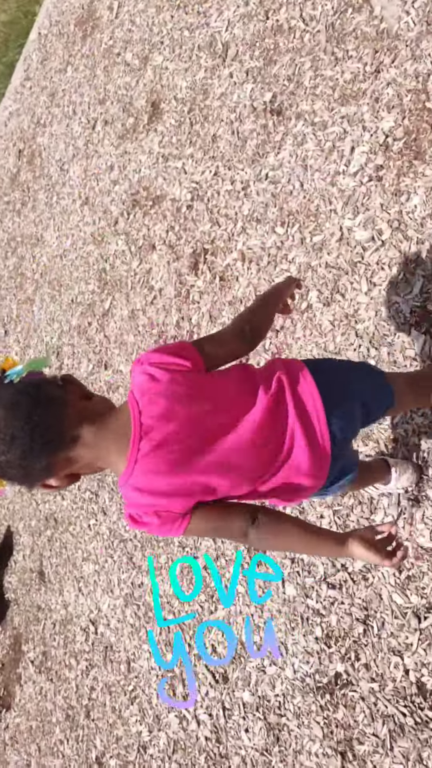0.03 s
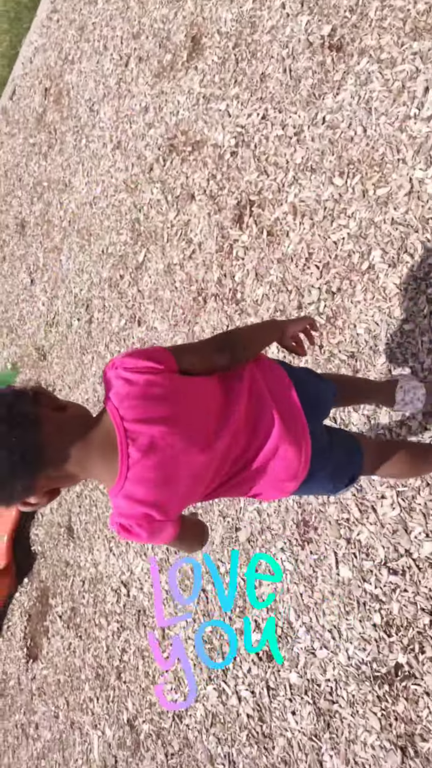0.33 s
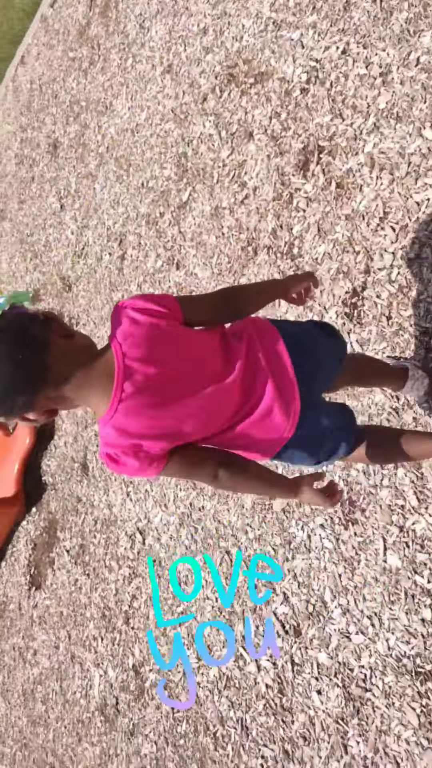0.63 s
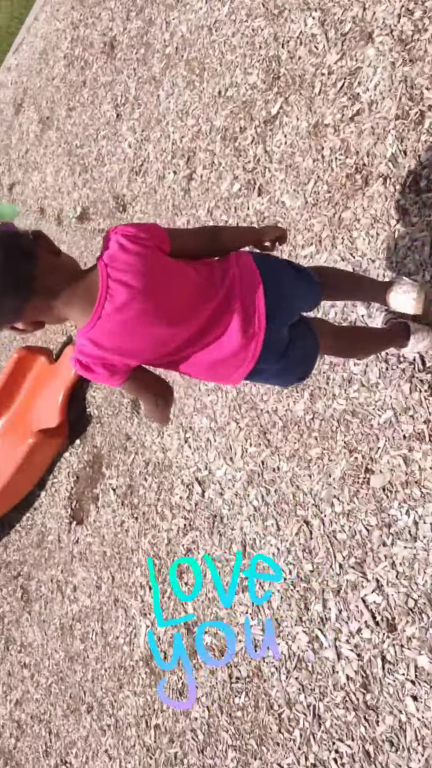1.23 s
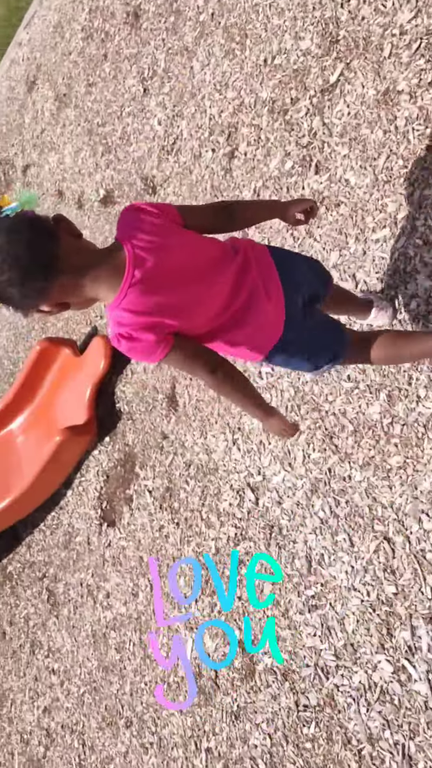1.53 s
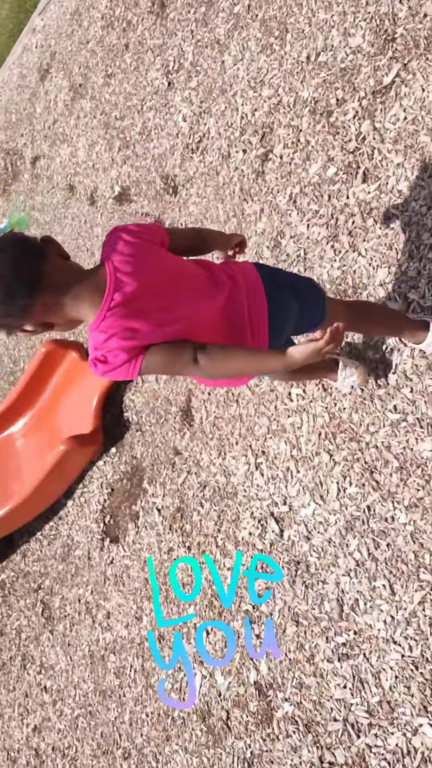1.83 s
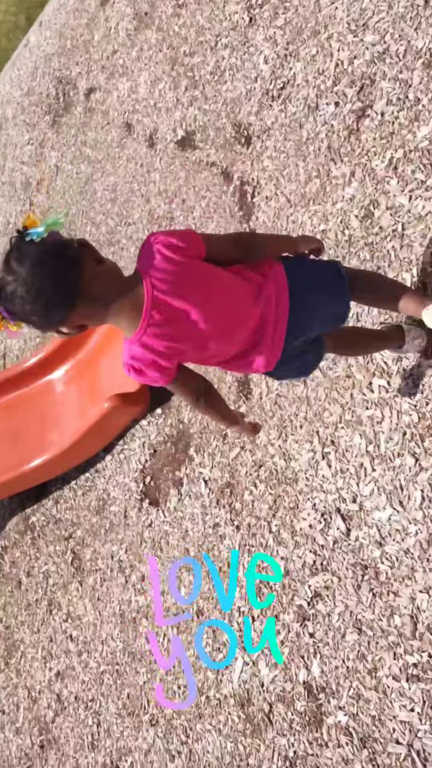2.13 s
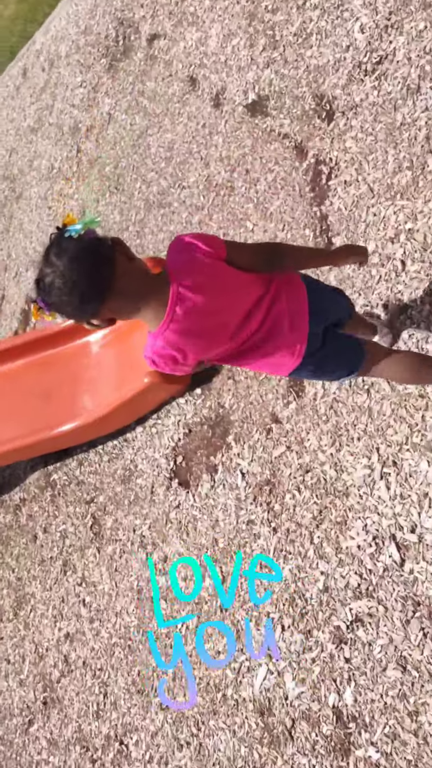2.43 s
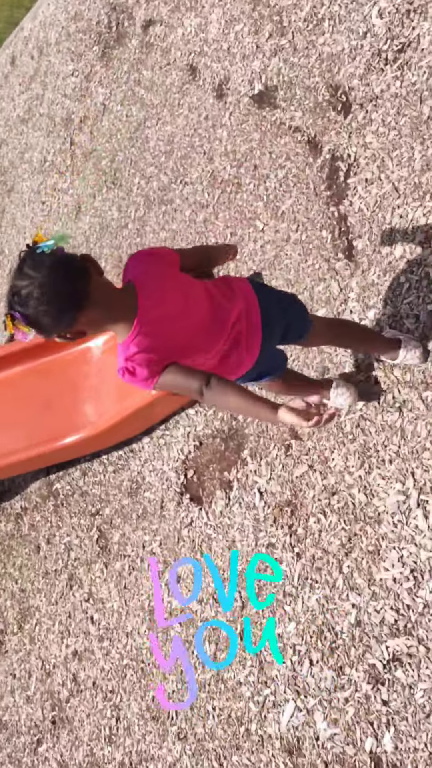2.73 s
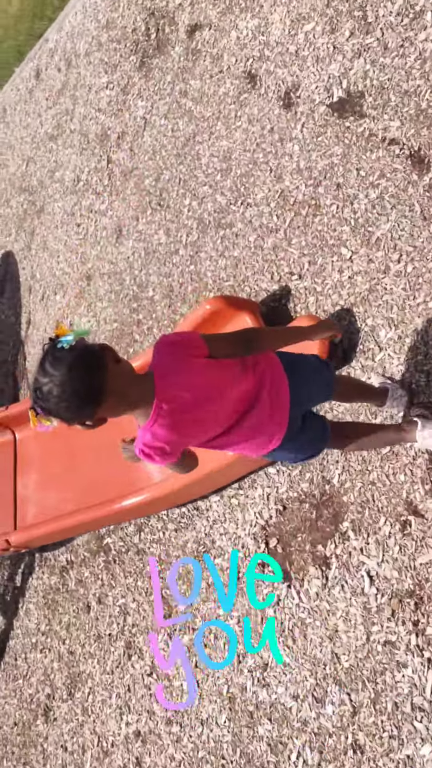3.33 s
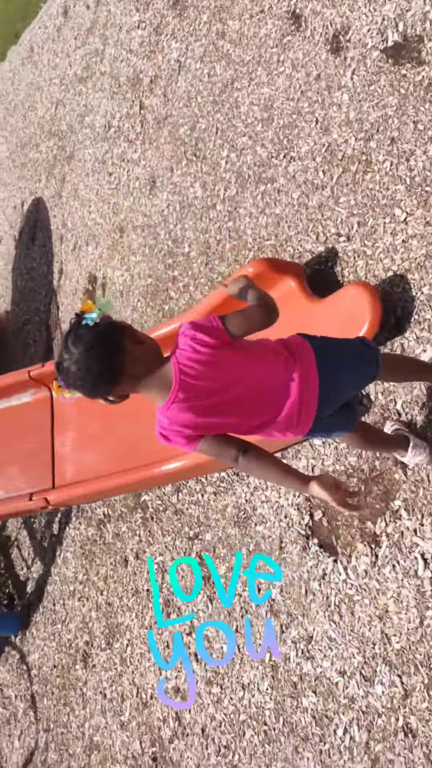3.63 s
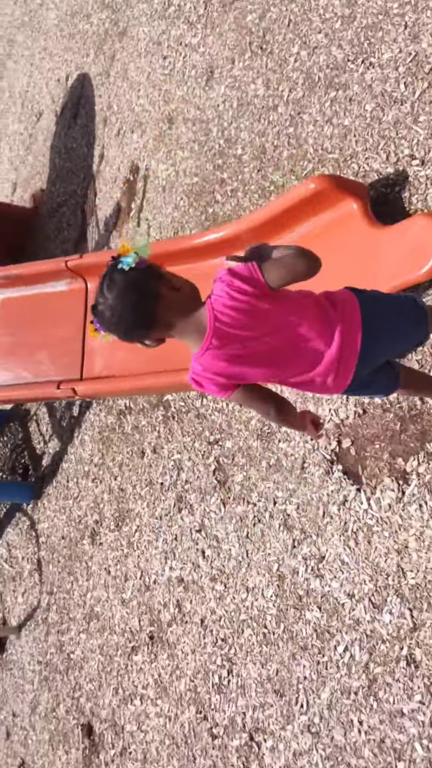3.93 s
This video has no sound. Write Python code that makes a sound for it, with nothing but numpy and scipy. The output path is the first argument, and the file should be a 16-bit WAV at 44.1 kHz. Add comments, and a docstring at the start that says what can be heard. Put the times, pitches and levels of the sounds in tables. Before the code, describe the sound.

Gusty wind buffets the microphone, with faint, slow steps crunching wood chips and light metal clinks.

```python
"""Wind rumbles and puffs on a microphone, over faint, slow steps on playground wood chips.
Turbulent pressure at the microphone port makes the rumble, and single eddies make the thumps.
Each step crunches as chip strikes chip, and a few chips snap. Small metal pieces carried by the
walker, probably keys, clink and ring in their modes. A soft outdoor hush and a faint,
flickering hiss lie behind."""
import sys
import numpy as np
from scipy.fft import rfft, irfft, next_fast_len
from scipy.io import wavfile
from scipy.ndimage import uniform_filter1d, map_coordinates

SR = 44100
rng = np.random.default_rng(int(sys.argv[2]) if len(sys.argv) > 2 else 0)


def transcribe(u):
    """Save the signal u as a 16-bit wav file named by the first command-line argument.

    u: samples, shape (n,) or (channels, n), limited to [-1, 1]; the rate is SR.
    q: integer samples, one column per channel.
    """
    v = np.clip(np.atleast_2d(u).T, -1, 1)
    q = np.round(v * 32767).astype(np.int16)
    wavfile.write(sys.argv[1], SR, q)


N = 176400

# spectrum of a hard, brief contact: frequency_hz, level_db
CLACK_SPECTRUM = [(1500, -10), (4000, -13.5), (6500, -10.5), (9000, -0.5), (12000, -1), (15500, -7)]
# bright spectrum of the steps' scrape and the background hiss: frequency_hz, level_db
BRIGHT_SPECTRUM = [(2000, -18), (4000, -5.5), (7000, 4), (11000, 3), (15500, -2)]


def amp(db):
    """Decibels to amplitude ratio."""
    return 10 ** (np.asarray(db) / 20)


def wobble(knots_per_s):
    """Slow random modulation: a spline through Gaussian values."""
    return map_coordinates(rng.standard_normal(2048), [np.arange(N) * knots_per_s / SR], mode="wrap")


def coloured(x, spectrum):
    """Spectral shaping by (frequency_hz, level_db) points on a log frequency axis."""
    size = next_fast_len(len(x) + 4096)
    hz, db = np.transpose(spectrum)
    gain = amp(np.interp(np.log(np.fft.rfftfreq(size, 1 / SR) + 1), np.log(hz), db))
    return irfft(rfft(x, size) * gain, size)[:len(x)]


def steadied(x, window_s=0.019):
    """Division by the running rms evens out the loudness of a noise."""
    power = np.abs(uniform_filter1d(x ** 2, int(window_s * SR)))
    return x / np.sqrt(power + 1e-20)


def shot_noise(spectrum, impulses_per_s=2500, spread_db=5.3):
    """Dense, tiny impulses at random times merge into a grainy noise."""
    impulses = rng.random(N) < impulses_per_s / SR
    sizes = rng.choice([-1, 1], N) * amp(spread_db * rng.standard_normal(N))
    return steadied(coloured(impulses * sizes, spectrum))


def swell(t, rise_s, decay_s):
    """A Gaussian rise to 1 at t = 0, then exponential decay."""
    return np.exp(-(np.minimum(t, 0) / rise_s) ** 2 - np.maximum(t, 0) / decay_s)


def burst(spectrum, rise_s, decay_s):
    """A transient of shaped noise, peak 1, centred on the crest of its envelope."""
    t = np.arange(-4096, 4096) / SR
    x = coloured(rng.standard_normal(len(t)) * swell(t, rise_s, decay_s), spectrum)
    return x / np.abs(x).max()


def add(out, time_s, x, centred=False):
    """Superpose x on out, starting or centred at time_s."""
    i = round(time_s * SR) - (len(x) // 2 if centred else 0)
    part = x[max(-i, 0):max(N - i, 0)]
    out[max(i, 0):max(i, 0) + len(part)] += part


def eddy(hz, width_s, waver):
    """A passing vortex swings the pressure for one or two uneven cycles; peak 1, centred."""
    t = np.arange(-4096, 4096) / SR
    uneven = map_coordinates(rng.standard_normal(128), [(t - t[0]) * 250], mode="wrap")
    cycles = np.cumsum(hz * np.exp(waver * uneven)) / SR + rng.random()
    swing = np.sin(2 * np.pi * cycles) / np.cosh(np.minimum(np.abs(t) / width_s, 20))
    return swing / np.abs(swing).max()


def wind_puffs():
    """Eddies striking the port make pressure pulses: dull thump, hollow knock, sharp edge, spatter."""
    # eddies at the port: centre_s, thump_db, thump_hz, edge_db
    eddies = [(0.02, -8, 169.3, -17.5), (0.063, -28, 187, -17.5), (0.222, -8.5, 159.3, -35),
              (0.254, -8, 150.5, -34), (0.358, -1.5, 171.9, -21.5), (0.459, -3.5, 137.6, -29.5),
              (0.515, -7.5, 157, -32), (0.605, -7, 167.8, -28.5), (0.74, -11.5, 134, -13.5),
              (0.758, -9, 85.4, -35), (0.797, -9.5, 137.5, -22), (0.862, -7.5, 132.2, -28.5),
              (0.919, -4, 202.6, -22), (0.932, -8, 200, -21), (0.996, -14, 179.6, -1.5),
              (1.005, -8.5, 161, -28), (1.027, -5, 192.9, -19), (1.094, -2.5, 149.4, -37.5),
              (1.128, -14, 135.3, -14.5), (1.18, -6, 169.7, -32), (1.329, -6.5, 193.2, -37),
              (1.351, -32, 195, -11), (1.368, -6, 215.2, -19), (1.578, -6.5, 211.2, -21.5),
              (1.61, -8, 129.8, -36.5), (1.676, -6, 159.6, -46.5), (1.692, -2, 163.6, -27),
              (1.82, -5.5, 153.5, -17), (1.873, -5.5, 181, -20.5), (1.932, -5.5, 172, -41.5),
              (2.056, -7, 154.5, -24), (2.102, -16, 186, -19), (2.125, -13.5, 179.2, -17),
              (2.271, -8.5, 178.9, -31.5), (2.33, -8, 121.7, -48), (2.378, -4, 143.9, -25),
              (2.431, -8, 140.2, -25.5), (2.479, -6, 185.9, -24), (2.5, -4, 135, -41),
              (2.672, -10.5, 141.5, -48), (2.702, -6.5, 141.5, -35), (2.793, -5, 118.8, -27),
              (2.858, -13, 180.3, -33.5), (2.895, -9, 160.5, -33.5), (2.966, -8, 108.5, -35),
              (3.117, -6, 210.8, -27.5), (3.187, -4.5, 150.4, -36.5), (3.314, -6, 147.7, -34),
              (3.636, -7.5, 258, -43), (3.65, -6.5, 225, -25), (3.803, -9.5, 123.3, -28.5),
              (3.988, -7.5, 159.7, -28.5)]
    # rough noise around the edge: frequency_hz, level_db
    spatter_spectrum = [(150, -18.5), (330, 3.5), (450, 2.5), (620, -6.5), (850, -18), (1300, -38),
                        (2500, -74.5), (4000, -120)]
    out = np.zeros(N)
    for centre_s, thump_db, thump_hz, edge_db in eddies:
        thump = amp(thump_db - 6.5) * eddy(thump_hz, width_s=0.0034, waver=0.2497)
        knock = amp((thump_db + edge_db) / 2 - 2.5) * eddy(hz=289.22, width_s=0.0026, waver=0.1482)
        edge = amp(edge_db - 6) * eddy(hz=390, width_s=0.0014, waver=0.15)
        spatter = amp(edge_db - 4.5) * burst(spatter_spectrum, rise_s=0.003, decay_s=0.005)
        add(out, centre_s, thump + knock + edge + spatter, centred=True)
    return out


def wind_rumble(gain_db=0.5, jitter_db=2):
    """Turbulent pressure at the port: a low rumble and a higher, fitful flutter follow the breeze."""
    # envelopes of the two bands: time_s, level_db
    rumble_levels = [(0.0, -13), (0.18, -29), (0.38, -22.5), (0.67, -29), (0.73, -17.5), (1.2, -20.5),
                     (1.25, -27), (1.45, -18), (1.76, -27.5), (1.78, -18), (1.98, -25), (2.02, -16),
                     (2.21, -37), (2.23, -30), (2.51, -25), (2.62, -33.5), (2.67, -31.5), (2.75, -28.5),
                     (2.8, -17), (2.84, -26), (2.97, -23), (3.03, -35), (3.1, -25.5), (3.26, -27),
                     (3.31, -26), (3.39, -29.5), (3.43, -24.5), (3.65, -26.5), (3.68, -19.5), (4.0, -21.5)]
    flutter_levels = [(0, -35), (.07, -24.5), (0.109, -38.5), (.4, -29.5), (.5, -44), (.679, -38.5),
                      (.729, -21.5), (.88, -36), (1.0, -23), (1.08, -24), (1.21, -27), (1.27, -47),
                      (1.36, -31), (1.431, -32), (1.499, -26), (1.55, -38.5), (1.76, -36), (2.038, -25),
                      (2.17, -47.5), (2.74, -48.5), (2.82, -30.5), (3.03, -48.5), (3.6, -54.5),
                      (3.649, -43), (3.82, -31), (4, -42.5)]
    # their spectra: frequency_hz, level_db
    rumble_spectrum = [(20, -25), (40, -19), (70, 1), (100, 5), (150, -1.5), (250, -11.5), (350, -33.5),
                       (500, -48.5), (900, -73.5), (2000, -120)]
    flutter_spectrum = [(100, -19.5), (220, 11), (300, 6.5), (450, -4.5), (650, -17), (1000, -34.5),
                        (2000, -86), (4000, -120)]
    bands = [(rumble_levels, rumble_spectrum, 35), (flutter_levels, flutter_spectrum, 60)]
    out, t = np.zeros(N), np.arange(N) / SR
    for levels, spectrum, knots_per_s in bands:
        level_db = np.interp(t, *np.transpose(levels)) + gain_db + jitter_db * wobble(knots_per_s)
        out += amp(level_db) * steadied(coloured(rng.standard_normal(N), spectrum))
    return out


def footsteps():
    """Granular compaction: the sole thuds into the chips, which crunch and scrape under it."""
    # footfalls: crest_s, thud_db, crunch_db, scrape_db, rise_s, decay_s
    footfalls = [(0.189, -63.5, -54, -57, .017, 0.027), (0.241, -38.5, -48.5, -58.5, .04, 0.027),
                 (1.01, -65.5, -70, -64.5, 0.029, 0.028), (1.075, -55.5, -59, -73.5, 0.018, .02),
                 (1.253, -40, -57, -80, .01, .03), (1.51, -51.5, -61.5, -77, 0.021, .02),
                 (1.915, -71, -61, -65.5, 0.031, 0.084), (2.689, -74, -75.5, -76.5, 0.043, 0.035),
                 (3.57, -56, -50.5, -67.5, 0.027, .028)]
    # dull thud and woody crunch: frequency_hz, level_db
    thud_spectrum = [(200, -12.5), (450, 3.5), (1100, -9), (2500, -45.5)]
    crunch_spectrum = [(300, -12), (800, 7.5), (1600, 5), (2700, 3.5), (3600, -9.5), (6000, -16),
                       (15500, -34.5)]
    thud, crunch, scrape = map(shot_noise, (thud_spectrum, crunch_spectrum, BRIGHT_SPECTRUM))
    out, t = np.zeros(N), np.arange(N) / SR
    for crest_s, thud_db, crunch_db, scrape_db, rise_s, decay_s in footfalls:
        grains = amp(thud_db) * thud + amp(crunch_db) * crunch + amp(scrape_db) * scrape
        out += grains * swell(t - crest_s, rise_s, decay_s)
    return out


def single_chips(snap_rise_s=0.0015, tick_rise_s=0.0005):
    """Brittle fracture makes a chip snap; a light impact makes a loose one tick."""
    # chips breaking and chips touching: start_s, level_db
    snaps = [(0.379, -48), (0.8959, -46.5), (1.0879, -40.5), (1.483, -47.5), (1.5196, -39.5),
             (2.441, -51.5), (2.7, -47.5), (2.8709, -42.5), (2.88, -47), (3.4538, -47.5)]
    ticks = [(0.1635, -46.5), (0.2788, -59), (0.465, -50), (0.4714, -57.5), (0.9797, -50), (1.1892, -47.5),
             (1.3289, -51.5), (2.0103, -51.5), (3.6471, -50), (3.682, -46.5)]
    # breaking wood: frequency_hz, level_db
    snap_spectrum = [(300, -13.5), (900, 13.5), (1800, 9), (2800, 0.5), (4000, -10), (7000, -35),
                     (15000, -26.5)]
    out = np.zeros(N)
    for start_s, level_db in snaps:
        snap = amp(level_db + 7) * burst(snap_spectrum, snap_rise_s, decay_s=0.0013)
        add(out, start_s + snap_rise_s, snap, centred=True)
    for start_s, level_db in ticks:
        tick = amp(level_db + 2) * burst(CLACK_SPECTRUM, tick_rise_s, decay_s=0.0015)
        add(out, start_s + tick_rise_s, tick, centred=True)
    return out


def keys(rise_s=0.00028, rebound_s=0.006, rebound_db=-9, spread_db=2.5, blur_hz=50):
    """Each impact clacks, rebounds and excites damped modes; rubbing between keys blurs the ring."""
    # keys touching: start_s, clack_db, then ring_db at each of ring_hz
    touches = [(0.173, -46, -69.5, -64.5, -55.5, -61), (0.561, -53.5, -67, -59.5, -62.5, -59),
               (0.602, -64, -71.5, -68, -72, -76), (0.703, -68, -68.5, -75, -89, -83),
               (0.757, -64, -85, -89, -75.5, -70), (1.099, -61.5, -77, -65, -66, -84.5),
               (1.207, -50, -93, -73.5, -57.5, -67.5), (1.836, -51, -70.5, -63, -72, -69),
               (1.898, -48.5, -69, -63, -59, -75.5), (1.923, -61, -81, -78.5, -62, -73),
               (1.98, -50.5, -87, -69.5, -89, -58.5), (2.059, -64.5, -95, -69, -85, -67),
               (2.152, -65.5, -88, -65.5, -73.5, -83), (2.6, -70, -86, -81, -87.5, -61),
               (2.626, -52, -71, -77, -71, -58), (2.665, -47.5, -85, -80, -81.5, -75),
               (2.766, -60.5, -85, -64, -62, -67.5), (2.947, -67.5, -71.5, -70.5, -76.5, -66),
               (3.326, -69, -85, -81, -65, -102), (3.395, -56.5, -83, -62.5, -80.5, -57),
               (3.411, -63.5, -90, -92, -87, -84.5), (3.44, -62.5, -74, -71.5, -80.5, -66.5),
               (3.486, -59, -75.5, -70.5, -61, -72.5), (3.512, -45, -76, -59.5, -61, -70),
               (3.53, -48, -73.5, -75, -77, -70.5)]
    # points on the ring's spectral envelope: frequency_hz
    ring_hz = [3900, 8000, 11450, 14400]
    # modes of the keys: frequency_hz, level_db, t60_s
    modes = [(3910, -4, .1), (7930, -8, .05), (9310, -6, .07), (11450, -2, .04), (12150, -9, .02),
             (14500, -5, .03), (15220, 1, .035)]
    out, t = np.zeros(N), np.arange(SR // 4) / SR
    mode_hz, mode_db, t60_s = np.transpose(modes)[:, :, None]
    for start_s, clack_db, *ring_db in touches:
        balance, damping, phase = rng.standard_normal((3, *mode_hz.shape))
        level_db = 12.5 + mode_db + np.interp(mode_hz, ring_hz, ring_db) + spread_db * balance
        fade = np.exp(-np.log(1000) * t / t60_s * np.exp(0.5 * damping))
        # a random walk in phase broadens each spectral line
        blur = np.cumsum(rng.standard_normal(fade.shape), 1) * np.sqrt(2 * np.pi * blur_hz / SR)
        ring = amp(level_db) * fade * np.sin(2 * np.pi * (mode_hz * t + phase) + blur)
        add(out, start_s, ring.sum(0) * (1 - np.exp(-t / rise_s)))
        for delay_s, contact_db in [(0, 0), (rebound_s * (0.5 + rng.random()), rebound_db)]:
            spectrum = [(hz, db + spread_db * rng.standard_normal()) for hz, db in CLACK_SPECTRUM]
            clack = amp(clack_db + 12 + contact_db) * burst(spectrum, rise_s, decay_s=0.0012)
            add(out, start_s + rise_s + delay_s, clack, centred=True)
    return out


def flickering_hiss(level_db=-79, flicker_db=2.5):
    """A faint, grainy high hiss flickers in the background: amplitude-modulated shot noise."""
    return amp(level_db + flicker_db * wobble(45)) * shot_noise(BRIGHT_SPECTRUM)


def hush(level_db=-49, drift_db=0.5):
    """Open-air ambient noise, broadband and nearly stationary."""
    # outdoor background: frequency_hz, level_db
    spectrum = [(100, 8.5), (400, -0.5), (750, 0.5), (1100, -4), (1800, -9.5), (2700, -13.5), (3400, -22),
                (5000, -28), (7500, -34.5), (15000, -41.5)]
    envelope = amp(level_db + drift_db * wobble(24))
    noise = coloured(rng.standard_normal(N), spectrum)
    return envelope * noise / np.sqrt(np.mean(noise ** 2))


def scene():
    """The pressures superpose at one microphone, without echoes."""
    mix = wind_rumble() + wind_puffs() + footsteps() + single_chips() + flickering_hiss()
    return (mix + keys() + hush())[None]


def record(dry):
    """Band limiting: an ideal low-pass filter removes the highest treble."""
    size, cutoff_hz = next_fast_len(N + 4096), 15800
    passband = np.fft.rfftfreq(size, 1 / SR) < cutoff_hz
    return irfft(rfft(dry, size) * passband, size)[:, :N]


dry = scene()
out = record(dry)
transcribe(out)
```